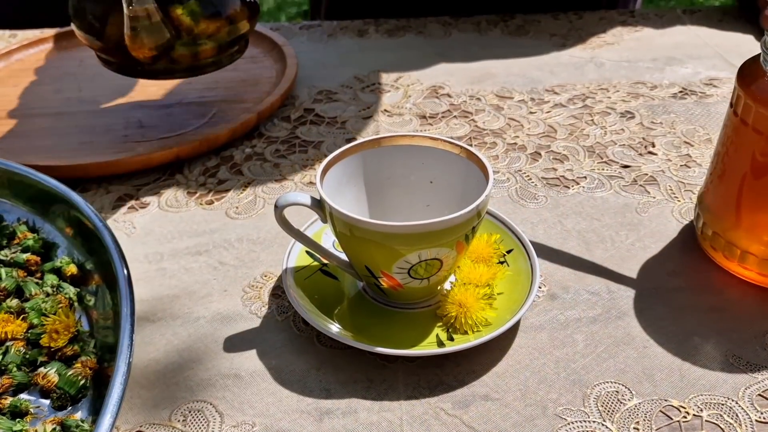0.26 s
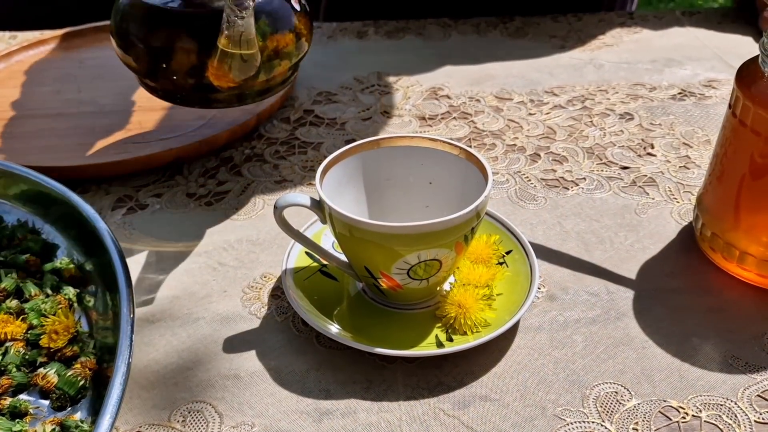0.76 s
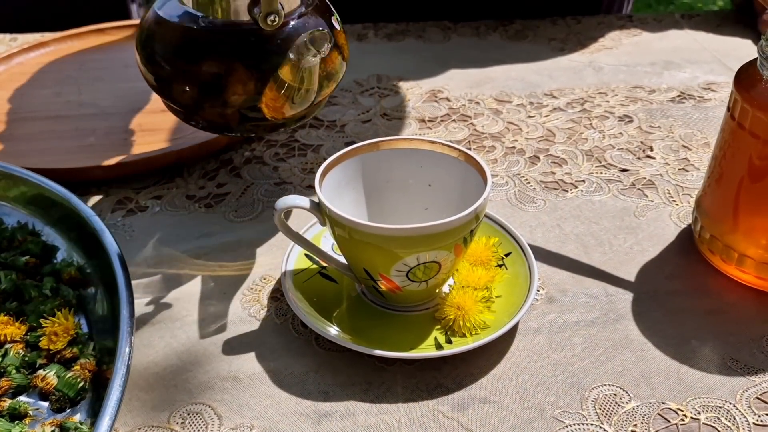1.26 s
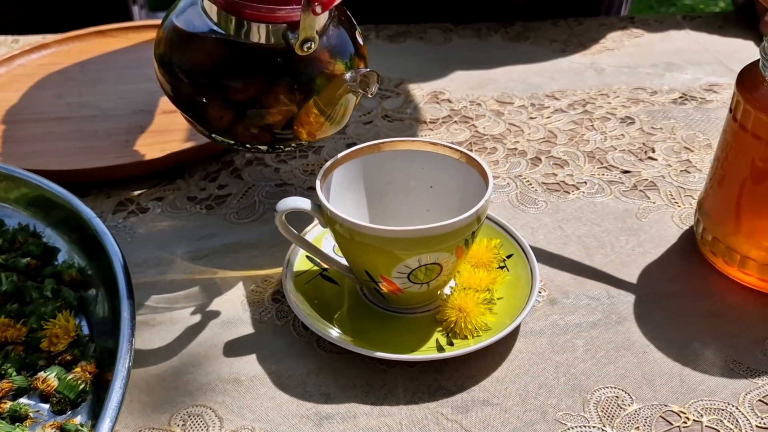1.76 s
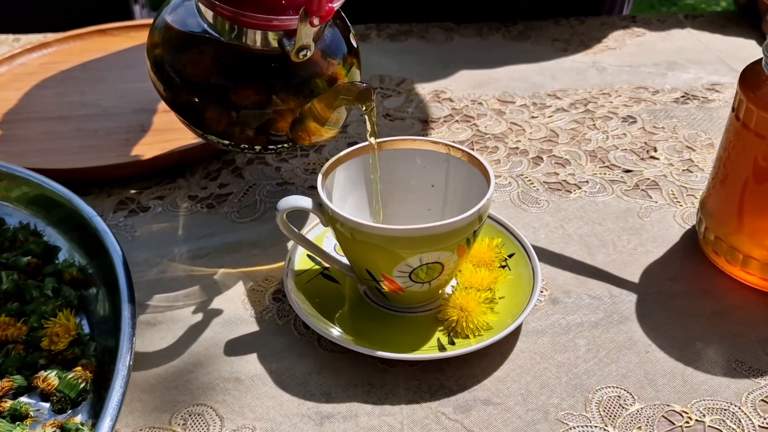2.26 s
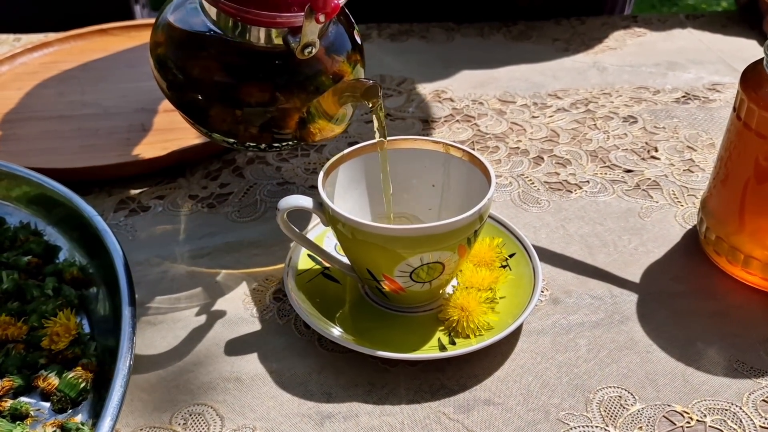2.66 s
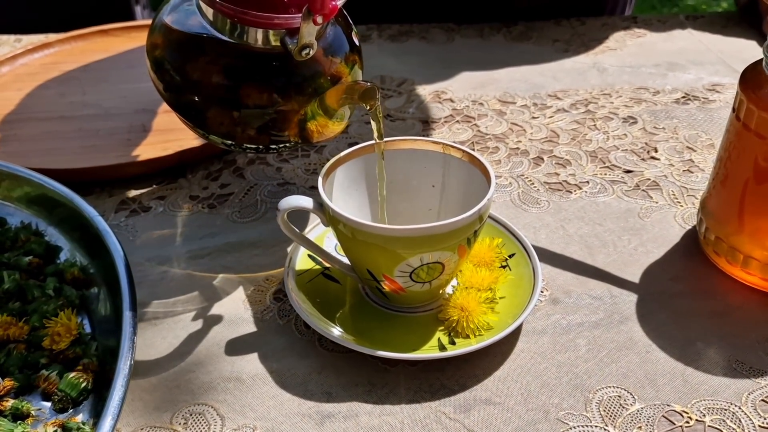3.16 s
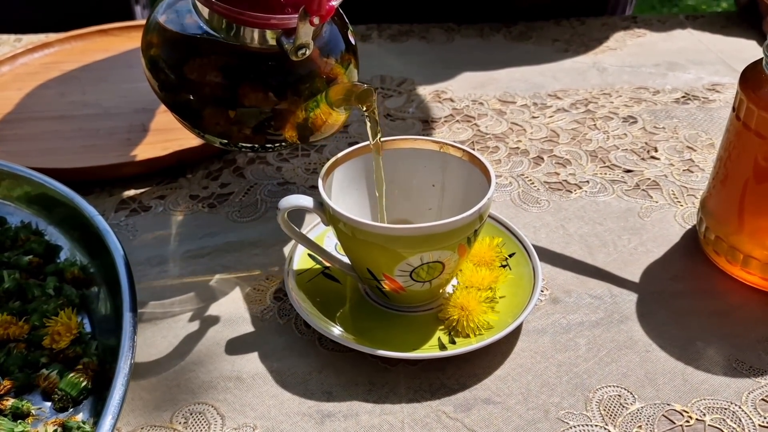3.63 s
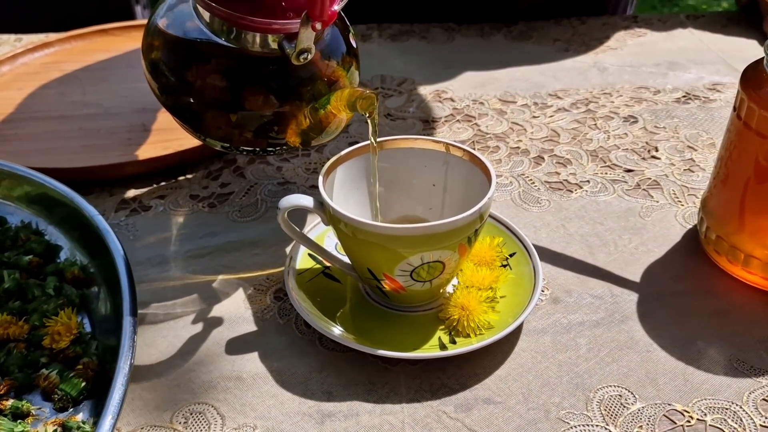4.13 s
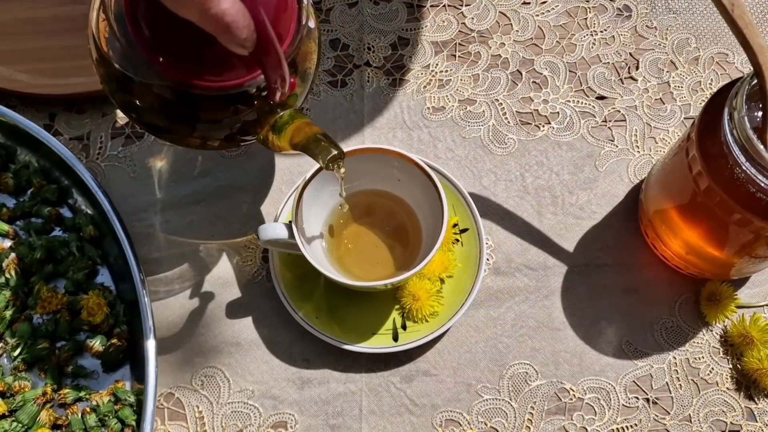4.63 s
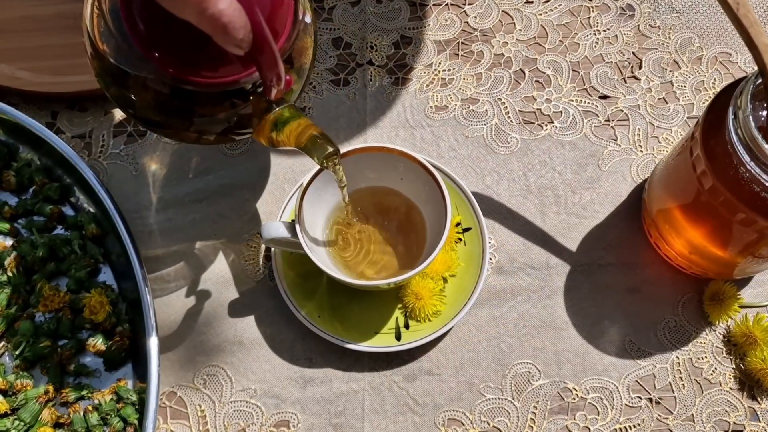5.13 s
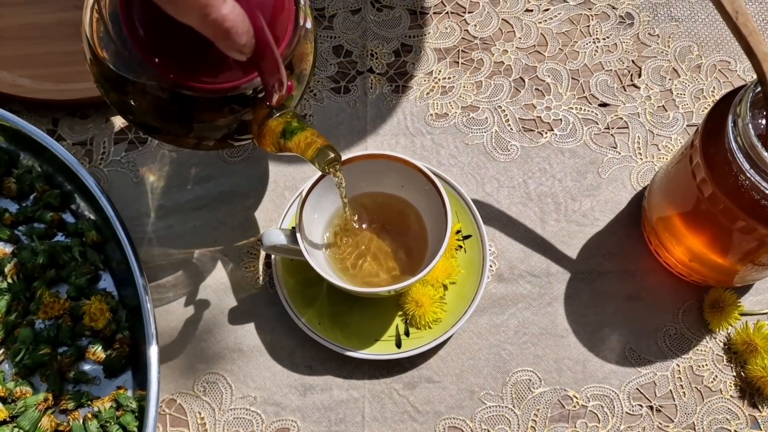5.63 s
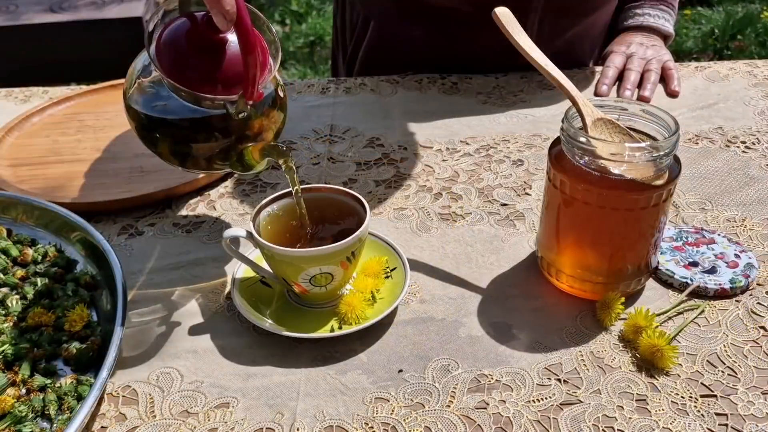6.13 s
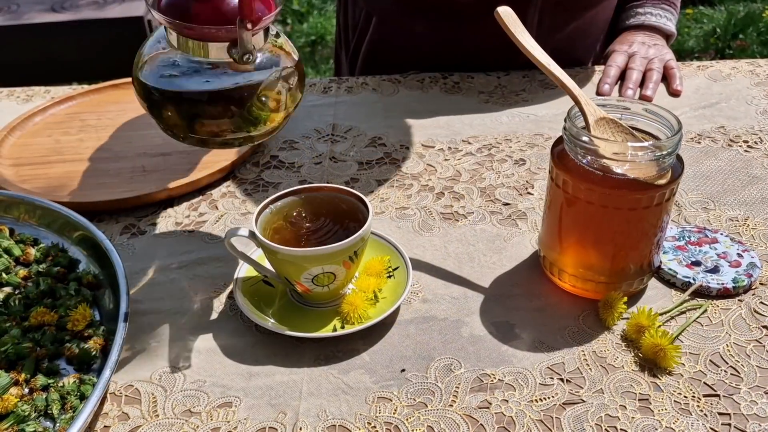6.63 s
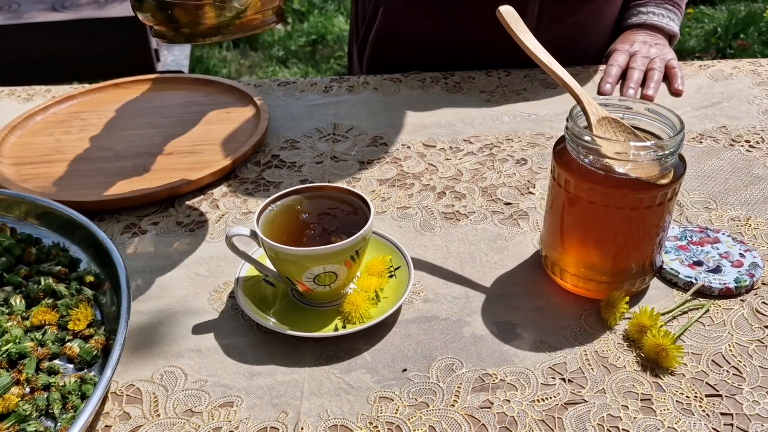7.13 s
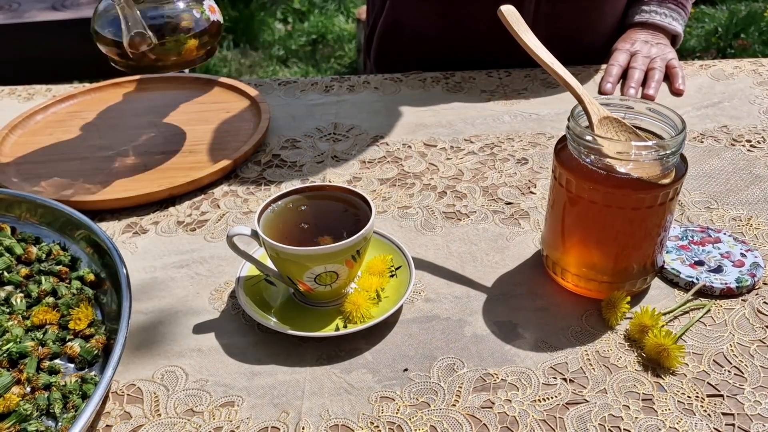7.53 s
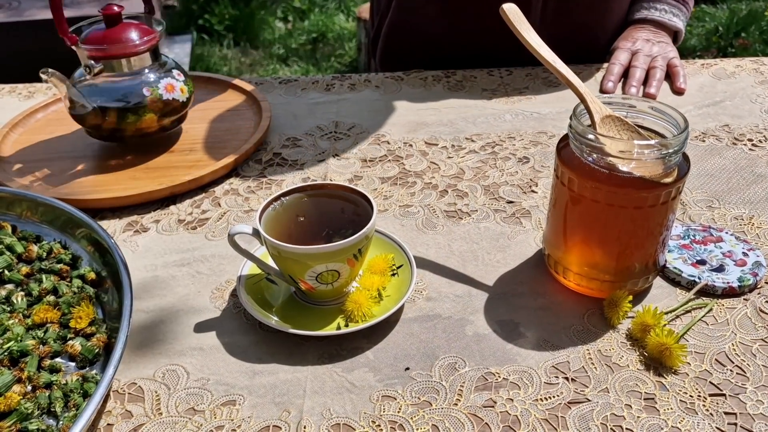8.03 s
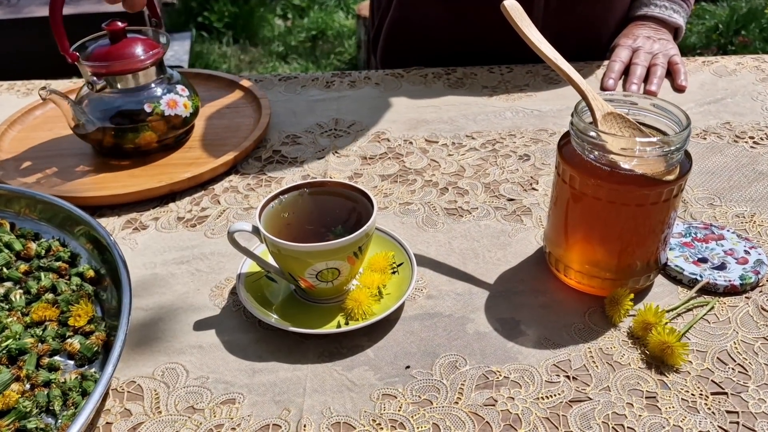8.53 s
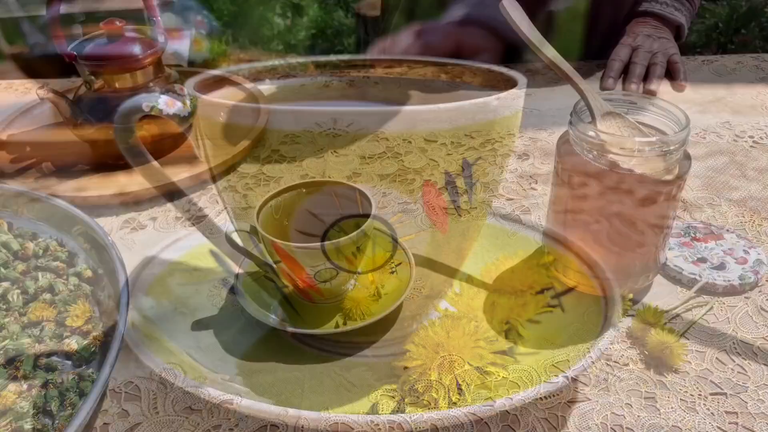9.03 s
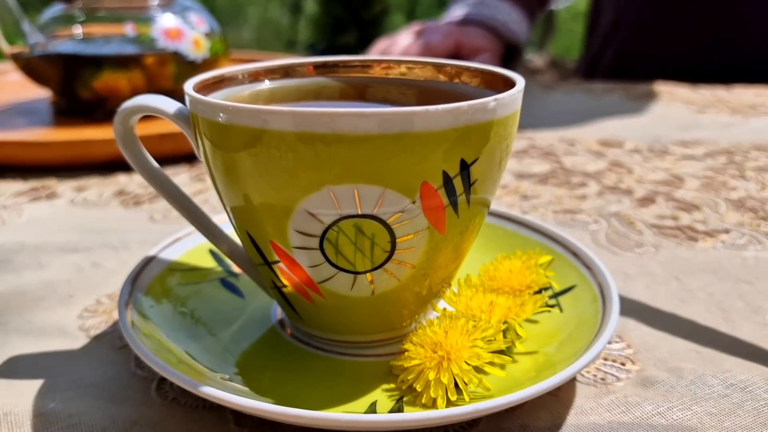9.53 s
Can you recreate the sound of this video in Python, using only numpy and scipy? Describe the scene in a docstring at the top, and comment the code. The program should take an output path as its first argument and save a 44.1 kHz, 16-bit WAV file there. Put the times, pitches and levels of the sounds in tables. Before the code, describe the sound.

A thin stream of tea drips and plinks into a cup near the microphone at an outdoor table, starting just before a rooster gives one hoarse crow. Chicks peep and sparrows chirp all along, with soft gusts of wind rumbling and other roosters very faint in the distance. The pour ends with a last plop, a teapot lands on a wooden tray with one knock, and a short high trill follows.

```python
"""A garden table: light wind rumbles on the microphone, sparrows chirp and chicks peep throughout.
About three seconds in, tea starts to trickle into a china cup, each drop a tick and a ringing bubble.
As it begins, a rooster crows once, breaking into a rasp on the long note; others answer from afar.
After the pour the teapot knocks down on a wooden tray, and a small bird trills amid scolding notes."""
import sys
import numpy as np
from scipy import signal
from scipy.fft import rfft, irfft, next_fast_len
from scipy.io import wavfile
from scipy.ndimage import uniform_filter1d

SR = 44100
rng = np.random.default_rng(int(sys.argv[2]) if len(sys.argv) > 2 else 0)


def inscribe(sig):
    """Save sig as 16-bit PCM at rate SR to the path in sys.argv[1].

    A 1-D sig is mono; a 2-D sig holds one channel per row.
    Samples are clipped to [-1, 1] before scaling.
    """
    pcm = np.round(np.clip(np.atleast_2d(sig).T, -1, 1) * 32767)
    wavfile.write(sys.argv[1], SR, pcm.astype(np.int16))


N = 431298
TIME = np.arange(N) / SR


def amp(db):
    """Decibels to gain."""
    return 10 ** (np.asarray(db) / 20)


def unit(x):
    """Scales to rms 1."""
    return x / np.sqrt(np.mean(x ** 2) + 1e-20)


def read(points, hz):
    """Reads a curve on a log-frequency axis."""
    f, value = np.transpose(points)
    return np.interp(np.log(hz + 1), np.log(f), value)


def follow(rows, t):
    """Reads every column of a breakpoint curve at t."""
    s, *columns = np.transpose(rows)
    return [np.interp(t, s, c) for c in columns]


def colour(x, points):
    """Applies an EQ curve of (frequency [Hz], gain [dB]) points."""
    n = x.shape[-1]
    size = next_fast_len(n + 512)
    gain = amp(read(points, np.fft.rfftfreq(size, 1 / SR)))
    return irfft(rfft(x, size) * gain, size)[..., :n]


def wander(n, hz):
    """Smooth random modulation of about rms 1, rolled off above hz."""
    size = next_fast_len(n + SR)
    lowpass = np.exp(-(np.fft.rfftfreq(size, 1 / SR) / hz) ** 2)
    return unit(irfft(rfft(rng.standard_normal(size)) * lowpass, size))[:n]


def phase(hz):
    """Running phase of a pitch curve."""
    return 2 * np.pi * np.cumsum(hz) / SR


def fade(n, share):
    """A window with soft ends."""
    return signal.windows.tukey(n, share)


def add(mix, s, sound, pan_db=0):
    """Lays a sound into the mix at time s; pan is left minus right."""
    part = mix[:, round(s * SR):][:, :sound.shape[-1]]
    part += (sound * amp([[pan_db / 2], [-pan_db / 2]]))[:, :part.shape[1]]


def ports(x, lag_s):
    """A sound from one side reaches the right microphone port late (or early)."""
    return np.array([x[0], np.interp(TIME - lag_s, TIME, x[1])])


def yard(x):
    """Scattered echoes from walls and trees, different at each ear."""
    # reverb time of the yard: (frequency [Hz], t60 [s])
    decay = [(300, 0.31), (1500, 0.24), (4000, 0.35), (9000, 0.079)]
    taps = rng.standard_normal((2, SR // 2)) * (rng.random((2, SR // 2)) < .04)
    taps[:, :SR // 120] = 0  # pre-delay
    hz, t, spectrum = signal.stft(taps, SR, nperseg=256)
    tail = signal.istft(spectrum * amp(-60 * t / read(decay, hz)[:, None]), SR, nperseg=256)[1]
    tail /= np.linalg.norm(tail, axis=1, keepdims=True)
    return signal.oaconvolve(x, tail, axes=1)[:, :N]


def bed(points, likeness):
    """Coloured noise, partly shared by both ears."""
    left, other = rng.standard_normal((2, N))
    right = likeness * left + np.sqrt(1 - likeness ** 2) * other
    return unit(colour(np.array([left, right]), points))


def turbulence(points, strength, likeness):
    """Low turbulence at the microphone, as strong as the wind blows."""
    noise = bed(points, likeness)
    return noise / np.sqrt(uniform_filter1d((noise ** 2).mean(0), size=6000)) * strength


def wind(eddy_hz=11, eddy_db=2.5, hiss_db=-70.5):
    """Gusts swell out of the breeze and shake the microphone; air rustles and far leaves hiss."""
    # the steady breeze: (time [s], buffeting [dB], rumble [dB], air rustle [dB])
    breeze = [(0, -60.5, -62, -68.5), (2.6, -62.5, -72, -74.5), (4.3, -54, -54, -69),
              (5.2, -65.5, -61, -72.5), (6.1, -55.5, -57, -68), (7.1, -59.5, -53, -67.5),
              (7.9, -56.5, -54, -67.5), (8.9, -54.5, -56.5, -64.5), (9.15, -58, -47.5, -63),
              (9.78, -60, -46, -59)]
    # gusts: (peak time [s], half width [s], buffeting [dB], rumble [dB])
    gusts = [(0.101, 0.22, -62.5, -59.5), (1.42, 0.24, -56, -55), (2.2, 0.073, -60, -66),
             (3.08, 0.062, -55, -51.5), (3.75, 0.051, -64, -60), (4.741, 0.095, -38.5, -38.5),
             (5.64, 0.19, -53, -56), (6.58, 0.061, -43, -49.5), (6.88, 0.13, -54.5, -49),
             (7.27, 0.012, -47.5, -55), (7.73, 0.057, -54, -54), (8.33, 0.22, -51.5, -55),
             (8.75, 0.013, -46.5, -46)]
    # EQ of the buffeting, sub rumble, air and leaves: (frequency [Hz], gain [dB])
    buffeting_eq = [(30, -24), (48, 4), (62, 5), (90, -8.5), (130, -18), (250, -34), (600, -54),
                    (2000, -86.5)]
    rumble_eq = [(12, -18), (25, -4), (36, 6), (46, -6), (70, -35.5), (300, -81)]
    air_eq = [(50, -15.5), (120, 2), (250, -1.5), (450, -7.5), (700, -13), (1400, -21), (3000, -17),
              (8000, -40.5)]
    leaves_eq = [(300, -2), (1000, -3), (2200, -4), (3700, -4), (4400, -10.5), (5200, -14), (8000, -15),
                 (9500, -26.5), (15500, -24)]
    buffeting, rumble, air = amp(follow(breeze, TIME))
    for s, width, buffeting_db, rumble_db in gusts:
        swell = np.exp(-.5 * ((TIME - s) / width) ** 2)
        buffeting = np.hypot(buffeting, amp(buffeting_db) * swell)
        rumble = np.hypot(rumble, amp(rumble_db) * swell)
    buffeting *= amp(eddy_db * wander(N, eddy_hz))
    low_end = turbulence(buffeting_eq, buffeting, .91) + turbulence(rumble_eq, rumble, .73)
    rustle = bed(air_eq, likeness=.41) * air * amp(2.5 * wander(N, 3))
    leaves = bed(leaves_eq, likeness=.017) * amp(hiss_db + 2 * wander(N, 15))
    return low_end + rustle + leaves


def distant(rows, overtone_db, jitter, arch, echo_db):
    """Gently arched notes blurred by the yard."""
    out = np.zeros((2, N))
    for s, length, hz, db in rows:
        u = np.linspace(-1, 1, int(length * SR))
        p = phase(hz * (1 - arch * u ** 2 + jitter * wander(len(u), 200)))
        tone = np.sin(p) + amp(overtone_db) * np.sin(2 * p)
        add(out, s, amp(db) * tone * fade(len(u), .25))
    return out + amp(echo_db) * yard(out)


def far_calls():
    """Thin whistles, slurred song, soft hoots, other roosters and a faint drone carry from afar."""
    # notes of each far voice: (start [s], length [s], pitch [Hz], level [dB])
    whistles = [(.78, 0.052, 3800, -70), (.88, .051, 3990, -70.5), (.96, .19, 3630, -67),
                (1.09, .12, 3670, -73.5), (1.79, 0.104, 3395, -65), (7.17, 0.12, 3330, -69.5),
                (7.44, 0.084, 3150, -71.5)]
    slurs = [(1.24, 0.064, 5270, -71), (1.6, 0.086, 6600, -85), (1.68, 0.1, 4920, -68),
             (1.8, 0.073, 2540, -67), (2.07, 0.083, 4680, -66.5), (2.16, 0.081, 4840, -60.5),
             (5.13, 0.035, 7360, -71.5), (5.16, 0.04, 5960, -70), (5.21, 0.0527, 5120, -55),
             (5.92, 0.069, 5600, -80), (6.95, 0.21, 7070, -73.5), (6.95, 0.15, 8200, -68.5)]
    hoots = [(2.475, 0.083, 589.5, -61.5), (2.565, 0.074, 593, -64), (2.66, 0.065, 598, -61),
             (2.745, 0.056, 603, -60.5)]
    roosters = [(2.22, 0.44, 713, -80.5), (6.36, 0.35, 724, -71), (8.1, 0.4, 715, -73)]
    drone = [(4.35, 1.5, 465, -78.5)]
    return (distant(whistles, overtone_db=-46, jitter=.0226, arch=.0176, echo_db=1.5)
            + distant(slurs, overtone_db=-49.5, jitter=.024, arch=.11, echo_db=-5.5)
            + distant(hoots, overtone_db=-36, jitter=.0035, arch=.024, echo_db=-4)
            + distant(roosters, overtone_db=-11, jitter=.055, arch=.1, echo_db=2)
            + distant(drone, overtone_db=-22, jitter=.045, arch=.01, echo_db=0))


def chatter(count=220, level_db=-73):
    """Many sparrows twitter in far hedges; only their mingled echoes arrive."""
    out = np.zeros((2, N))
    for when, pitch, length, loud, side, warble in rng.random((count, 6)):
        u = np.linspace(0, 1, int((.02 + .04 * length) * SR))
        bend = 1.12 - .24 * u + .06 * np.sin(2 * np.pi * (1 + 3 * warble) * u)
        tweet = np.sin(phase((2900 + 1500 * pitch) * bend)) * fade(len(u), .7)
        add(out, when * N / SR, tweet * amp(level_db + 4 * (loud - .5)), pan_db=6 * (side - .5))
    return yard(out)


def chicks(entry_s=.023, drop_s=.0075, attack_s=.018, release_s=.009, edge_db=-30, flutter_db=4):
    """Pure whistles with a faint hoarse edge settle on a note, sink, then drop as the breath stops."""
    # peeps: (start [s], length [s], pitch [Hz], level [dB], pan [dB],
    #         entry offset [share of pitch], fall over the note [share of pitch])
    peeps = [(.635, 0.063, 2097, -58.5, -3, -0.046, 0.11), (0.927, 0.082, 2290, -66, -9, -.03, 0.074),
             (1.244, 0.031, 2950, -56, 3, 0.04, 0.085), (1.379, 0.031, 2830, -58.5, -9, 0.076, 0.035),
             (1.499, 0.054, 3030, -60, 1, 0, 0.17), (1.633, 0.13, 2575, -63, -4, -0.2, 0.15),
             (1.984, 0.095, 2710, -60, 1, 0, .25), (2.425, 0.083, 2610, -57.5, -3, -0.089, 0.26),
             (2.64, 0.15, 2565, -53.5, -4, 0.16, 0.25), (2.92, 0.083, 2630, -54.5, -7, .05, 0.25),
             (2.997, .11, 2570, -45, -4, 0.17, .13), (3.157, 0.069, 3300, -57, -2, -0.51, 0.48),
             (5.323, 0.094, 2235, -63.5, -11, -0.023, .1), (5.837, 0.094, 2380, -63, -12, -0.051, 0.055),
             (6.028, 0.11, 2560, -44, -2, 0.3, 0.088), (6.394, 0.1, 2460, -54, -3, 0.09, .14),
             (6.547, 0.14, 2380, -55, -1, -0.22, 0.27), (6.625, .115, 2575, -41.5, -5, .38, 0.034),
             (6.71, 0.097, 2680, -53.5, -1, 0, 0.181), (6.837, 0.15, 2756, -56, -6.5, -0.06, .22),
             (6.89, 0.095, 2410, -54.5, -3, -0.12, 0.139), (6.953, .115, 2684, -41, 1.5, 0.3, 0.037),
             (7.28, 0.11, 2330, -51.5, -1, 0.19, 0.048), (7.341, 0.12, 2467, -63.5, -2, -.06, .15),
             (7.616, 0.13, 2697, -53, -2, -0.08, 0.17), (8.268, 0.1, 2356, -56, -4, -0.092, 0.11),
             (9.021, 0.1, 3300, -52, -6, -0.015, 0.037), (9.308, 0.11, 3220, -52.5, -7, -0.1, 0.11),
             (9.467, .125, 2400, -59.5, -2, -0.31, 0.247), (9.582, 0.11, 3234, -58.5, -11.5, -0.14, .13)]
    # loud peeps drop furthest: (level [dB], depth [share of the full drop])
    drop_by_level = [(-67, 0.43), (-48, 1)]
    # high peeps carry more octave: (pitch [Hz], octave level [dB])
    octave = [(2500, -33), (3200, -9.5)]
    # the hoarse edge: (frequency [Hz], gain [dB])
    edge_eq = [(5000, -25.5), (6500, -10), (8300, -3), (9500, -33)]
    out = np.zeros((2, N))
    for s, length, hz, db, pan_db, entry, fall in peeps:
        t = np.arange(0, length, 1 / SR)
        n = len(t)
        drop = .2 * follow(drop_by_level, db)[0] * np.exp((t - length) / drop_s)
        slide = 1 + entry * np.exp(-(t / entry_s) ** 1.464) + fall * (.5 - t / length) - drop
        p = phase(hz * slide * (1 + .006 * wander(n, 300) + .008 * wander(n, 60)))
        edge = unit(colour(rng.standard_normal(n), edge_eq))
        tone = np.sin(p) + amp(read(octave, hz)) * np.sin(2 * p) + amp(edge_db) * edge
        envelope = (1 - np.exp(-t / attack_s)) * (1 - np.exp((t - length) / release_s))
        add(out, s, tone * envelope * amp(db + flutter_db * wander(n, 51)), pan_db)
    return ports(out, lag_s=.00008) + amp(-12) * yard(out)


def chirp_gesture(t, length, top_hz, end_hz):
    """Pitch and strength of one chirp: a flick upward, then a fading, uneven zigzag downward."""
    attack_s, flick_s, fall_s, zigzag_hz = .006, .00283, .031, 107.2
    hold, fade_db = .28, -18  # the fade starts after this share of the length
    t = np.maximum(t, 0)
    u = t / length
    zigzag = -np.sin(2 * np.pi * zigzag_hz * t + 2 * u * wander(len(t), 40))
    glide_hz = end_hz + (top_hz - end_hz) * np.exp(-(t / fall_s) ** 1.623)
    hz = glide_hz * (1 - .25 * np.exp(-t / flick_s) + .076 * zigzag)
    faded = np.maximum(u - hold, 0) / (1 - hold)
    level_db = fade_db * faded + .5 * zigzag + 2 * wander(len(t), 110)
    return hz, np.minimum(t / attack_s, 1) * amp(level_db)


def sparrows(gain_db=1.5, octave_db=-23, third_db=-41, upper_db=-13, upper_ratio=1.4, jitter=.0356):
    """Both sides of the syrinx zigzag in pitch; far birds are mostly echo."""
    # chirps: (start [s], length [s], level [dB], tuning [ratio], end pitch [Hz], pan [dB], echo [dB])
    chirps = [(.379, 0.063, -42, 1.005, 2747, 1.5, -3), (1.245, .06, -74, 1.13, 4570, 5, 6),
              (1.919, 0.054, -38.5, 1.018, 2735, 1, -2.5), (2.168, 0.094, -62.5, 0.93, 2925, 3, 8),
              (2.807, .055, -35.5, .98, 2800, 0, -5.5), (3.709, 0.052, -35.5, 1.01, 2980, 0.5, -6.5),
              (4.934, 0.068, -38, 1.013, 2757, 2.5, -5), (5.193, 0.077, -51.5, 1.21, 4190, 2, -11),
              (5.674, 0.063, -35.5, 1.027, 2770, 5, -8), (5.947, 0.078, -67, 1.27, 4730, 8, -28),
              (6.416, 0.12, -47, 1.06, 3420, -1.5, -5), (8.017, 0.053, -72.5, 0.89, 3320, -4, 14.5),
              (8.584, 0.11, -51, 1.08, 3500, -0.5, -5.5), (8.832, 0.066, -63, 0.93, 3200, -2, 4)]
    # thin upstroke into a chirp: (time from its start [s], pitch before tuning [Hz], level [dB])
    upstroke = [(-.012, 4070, -41), (-.003, 5600, -11.5), (.004, 6500, -21.5), (.011, 7700, -40)]
    near, far = np.zeros((2, 2, N))
    for s, length, db, tuning, end_hz, pan_db, echo_db in chirps:
        t = np.arange(upstroke[0][0], length, 1 / SR)
        hz, strength = chirp_gesture(t, length, top_hz=4480 * tuning, end_hz=end_hz)
        lisp_hz, lisp_db = follow(upstroke, t)
        pitches = hz, np.minimum(hz * upper_ratio, 4900 * tuning), lisp_hz * tuning
        p, upper, lisp = (phase(f * (1 + jitter * wander(len(t), 585))) for f in pitches)
        voice = np.sin(p) + amp(octave_db) * np.sin(2 * p) + amp(third_db) * np.sin(3 * p)
        voice += amp(upper_db) * np.sin(upper)
        chirp = voice * strength + amp(lisp_db) * np.sin(lisp)
        chirp *= amp(db + gain_db) * fade(len(t), .019)
        add(near, s + t[0], chirp, pan_db)
        add(far, s + t[0], chirp * amp(echo_db), pan_db / 2)
    return ports(near, lag_s=.00005) + yard(far)


def songbirds(trill_hz=21, swing=.042, upper_db=-6, echo_db=-9):
    """A two-voiced warbling trill, with harsh scolding notes."""
    # contour of the high trill: (time [s], pitch [Hz], level [dB])
    trill = [(9.02, 6680, -80), (9.06, 7050, -55), (9.11, 6980, -49), (9.198, 6990, -57.5),
             (9.255, 6810, -49), (9.3, 6770, -52), (9.332, 6130, -70)]
    # scolding notes: (start [s], length [s], level [dB])
    scolds = [(9.078, 0.029, -46.5), (9.152, .02, -69), (9.191, 0.034, -42.5), (9.26, .02, -76)]
    # EQ of the scolding: (frequency [Hz], gain [dB])
    scold_eq = [(760, -71), (1300, -21.5), (2330, -4), (3050, -13), (3380, -3.5), (3570, -10), (4050, -0.5),
                (6800, -17), (8840, -49), (15000, -120)]
    out = np.zeros((2, N))
    t = np.arange(trill[0][0], trill[-1][0], 1 / SR)
    hz, db = follow(trill, t)
    for ratio, voice_db, crest_s in [(1, 0, 9.11), (1.135, upper_db, 9.122)]:
        warble = 1 + swing * np.cos(2 * np.pi * trill_hz * (t - crest_s)) + .019 * wander(len(t), 580)
        add(out, t[0], amp(db + voice_db) * np.sin(phase(hz * ratio * warble)))
    for s, length, level_db in scolds:
        n = int(length * SR)
        grit = rng.standard_normal(n) * amp(1.3 * wander(n, 400))
        add(out, s, amp(level_db) * unit(colour(grit, scold_eq)) * fade(n, .72))
    return ports(out, lag_s=.00003) + amp(echo_db) * yard(out)


def syrinx(hz, second_hz, rough):
    """Two membranes buzz together; strain breaks the clean tone into a rasp."""
    n = len(hz)
    p = phase(hz * (1 + .06 * rough * wander(n, 180) + .0018 * wander(n, 40)))
    p += .08 * wander(n, 350)  # uneven beats blur the high harmonics and leave the low ones clean
    q = phase(second_hz * (1 + .018 * wander(n, 200)))
    buzz, second = (unit(sum(np.cos(k * turn) for k in range(1, 19))) for turn in (p, q))
    # alternate beats differ: half harmonics, strongest just above the main resonance
    halves = .17 * (np.cos(5 * p / 2) + .22 * sum(np.cos((k + .5) * p) for k in range(1, 20)))
    rasp = unit(rng.standard_normal(n) * (1.3 + np.cos(p)) * amp(2.5 * wander(n, 90)))
    tone = (1 - .5 * rough) * buzz + (1 - rough) * halves + amp(-25 + 30 * rough) * second
    return tone + .55 * (rough + .12) * rasp


def rooster(attack_s=.028, scoop_s=.03, sag_s=.06, fade_db=-34, tired_db=-.5, echo_db=-5):
    """Each syllable scoops up, holds and sags; the syrinx rings the throat, rough if slack or tired."""
    # syllables: (start [s], hold [s], release [s], pitch [Hz], second membrane [Hz],
    #             level [dB], beak opening [0-1])
    crow = [(3.246, 0.13, 0.16, 759, 666.6, -44, 0), (3.528, .095, 0.048, 788.7, 655, -42, 0.97),
            (3.616, 0.059, 0.26, 824, 695, -39.5, 0.97), (3.764, 0.51, 0.24, 783.6, 591.6, -39.5, 0.95)]
    # throat resonances, beak wide open and half shut: (frequency [Hz], gain [dB])
    open_eq = [(400, -57), (620, -8), (790, -12.5), (1000, -24), (1250, -10.5), (1550, 0), (1850, -2.5),
               (2350, -7.5), (3050, -9.5), (3500, -14.5), (4500, -32.5), (6500, -20), (8400, -20.5),
               (10000, -51), (15000, -47)]
    half_shut_eq = [(400, -34), (660, -4.5), (1000, -59), (1300, 2.5), (1490, 6.5), (1700, 5.5),
                    (2300, -12.5), (2850, -5), (3700, -48), (5200, -12), (6300, -22), (9000, -24),
                    (11000, -72)]
    stamina_s, break_s = .3, .03  # the voice holds this long, then breaks this fast
    out = np.zeros((2, N))
    for s, hold, release, note_hz, second_hz, db, beak in crow:
        t = np.arange(0, hold + release, 1 / SR)
        released = np.maximum(t - hold, 0)
        scoop = np.exp(-t / scoop_s)
        sag = 1 - np.exp(-released / sag_s)  # the pressure lets go
        broken = np.clip((t - stamina_s) / break_s, 0, 1)
        rough = .04 + .38 * broken + .5 * (scoop + sag) + .15 * (1 - beak)
        bend = 1 - .08 * scoop - .045 * sag
        drive = syrinx(note_hz * bend, second_hz * bend, np.minimum(rough, 1))
        voice = beak * colour(drive, open_eq) + (1 - beak) * colour(drive, half_shut_eq)
        voice /= np.sqrt(uniform_filter1d(voice ** 2, size=2000))  # level it ahead of the envelope
        accent_db = 4 * np.exp(-((t - .06) / .018) ** 2)  # an early push of air
        release_db = fade_db * (released / release) ** 1.6
        level_db = db + accent_db + tired_db * broken + release_db + wander(len(t), 52)
        envelope = np.minimum(t / attack_s, 1) ** 2 * amp(level_db) * fade(len(t), .044)
        add(out, s, voice * envelope, pan_db=1.5)
    return ports(out, lag_s=-.00019) + amp(echo_db) * yard(out)


def bubble(hz, t60, rise_s=.053, pinch_s=.0004):
    """A trapped bubble pinches off and rings, its pitch rising ever faster as it nears the surface."""
    t = np.arange(int(t60 * SR)) / SR
    envelope = np.exp(-np.log(1000) * t / t60) * (1 - np.exp(-t / pinch_s))
    return np.sin(phase(hz * (1 + (t / rise_s) ** 2))) * envelope


def tea(splash_s=.0018, bubbles_per_s=30, echo_db=-14):
    """Drops tick on the tea and trap bubbles; the thin stream fizzes softly between them."""
    # drops: (time [s], bubble level [dB], bubble pitch [Hz], t60 [s], splash level [dB], pan [dB])
    drops = [(3.083, -48, 2590, 0.044, -58, 18), (3.2192, -33, 3940, 0.0081, -44, -7.5),
             (3.3367, -41, 3940, 0.014, -46, -6), (4.198, -23.5, 1316, 0.042, -26.5, 6),
             (4.245, -44, 1020, 0.05, -60, -7), (4.3275, -37, 3600, 0.013, -60, 4),
             (4.682, -47, 1360, 0.02, -52, 9), (4.7179, -44, 3530, 0.023, -41, -11),
             (4.734, -33, 1360, 0.013, -35, -4.5), (4.889, -43, 1440, 0.064, -58, -6),
             (4.906, -46.5, 2280, 0.017, -49, 10), (4.9988, -43, 2040, 0.019, -46, -9),
             (5.077, -49.5, 1465, 0.077, -61, -13), (5.082, -45, 1900, 0.032, -62, 7),
             (5.1, -48, 1500, 0.034, -60, 8), (5.118, -53, 1790, 0.021, -59, 7),
             (5.163, -43.5, 1460, 0.041, -51, -7), (5.165, -46, 1957, 0.033, -52, 16),
             (5.479, -53.5, 1420, 0.057, -57, 8), (5.852, -66, 14300, 0.037, -60, 18),
             (6.6186, -55.5, 11800, 0.11, -52, 14), (6.661, -55, 3320, 0.021, -35, 11.5),
             (6.6634, -30, 1654, 0.029, -55, 3)]
    # EQ of a splash: (frequency [Hz], gain [dB])
    splash_eq = [(300, -38), (700, -9), (1400, -47), (3400, 9), (5000, -13.5), (7500, -7.5), (10000, -18.5),
                 (15000, -25)]
    # fizz of fine bubbles over the pour: (time [s], level [dB])
    pour = [(2.9, -111), (3.3, -59), (4.6, -74.5), (5.2, -71.5), (5.8, -72), (6.6, -121), (6.8, -100)]
    out = np.zeros((2, N))
    t = np.arange(SR // 100) / SR
    for s, db, hz, t60, splash_db, pan_db in drops:
        add(out, s, amp(db) * bubble(hz, t60), pan_db)
        splash = unit(colour(rng.standard_normal(len(t)), splash_eq)) * np.exp(-t / splash_s) / 2
        add(out, s, amp(splash_db) * splash, pan_db)
    fizz = np.zeros(N)
    for hz in np.geomspace(1250, 2600, num=12):  # twelve bubble sizes, each at the same rate
        births = (rng.random(N) < bubbles_per_s / SR) * rng.random(N)
        fizz += signal.oaconvolve(births, bubble(hz, t60=.025))[:N]
    out += unit(fizz) * amp(follow(pour, TIME)[0])
    return out + amp(echo_db) * yard(out)


def teapot(s=8.4665, gain_db=-25, contact_s=.00016, settle_db=-13, echo_db=-30):
    """The pot lands on the wooden tray, then its base settles flat."""
    # modes of the tray and table: (frequency [Hz], level [dB], t60 [s])
    modes = [(91, -7, 0.11), (168, -10.5, 0.15), (204, -5, 0.095), (252, -2, 0.096), (308, -5, 0.12),
             (365, 5.5, 0.027), (470, -12.5, 0.11), (633, 0.5, 0.041), (763, -17, 0.059), (970, -8, 0.025),
             (1030, -28, 0.08), (1470, -19, 0.024), (2110, -14, 0.036)]
    t = np.arange(SR // 3) / SR
    # neighbouring modes start with opposite signs, so their peaks do not all line up
    ring = sum((-1) ** k * amp(db) * np.sin(2 * np.pi * hz * t) * np.exp(-np.log(1000) * t / t60)
               for k, (hz, db, t60) in enumerate(modes))
    ring *= amp(gain_db) * (1 - np.exp(-t / contact_s))
    out = np.zeros((2, N))
    for delay_s, db in [(0, .008), (.021, settle_db)]:
        add(out, s + delay_s, amp(db) * ring, pan_db=1)
    return ports(out, lag_s=.00018) + amp(echo_db) * yard(out)


def scene():
    """The garden mix: ambience at the back, birds around, tea things up front."""
    ambience = far_calls() + wind() + chatter()
    birds = chicks() + sparrows() + songbirds() + rooster()
    return ambience + birds + tea() + teapot()


def record(dry, cutoff_hz=15800):
    """A steep low-pass trims the very top of the mix."""
    lowpass = signal.firwin(511, cutoff_hz, window=("kaiser", 9), fs=SR)
    return signal.oaconvolve(dry, lowpass[None], "same")


dry = scene()
out = record(dry)
inscribe(out)
```